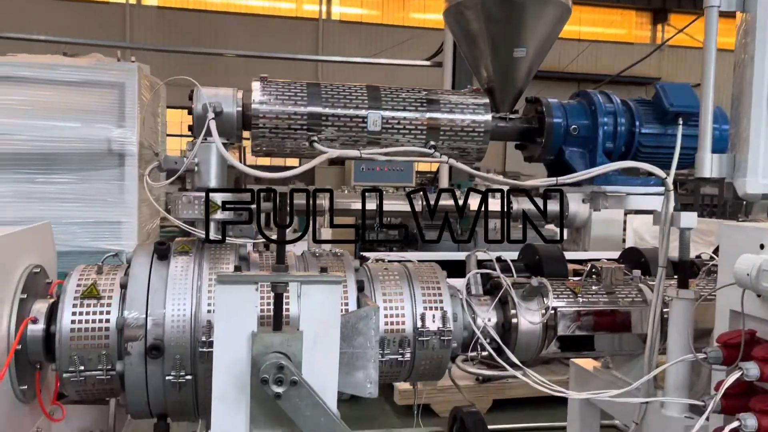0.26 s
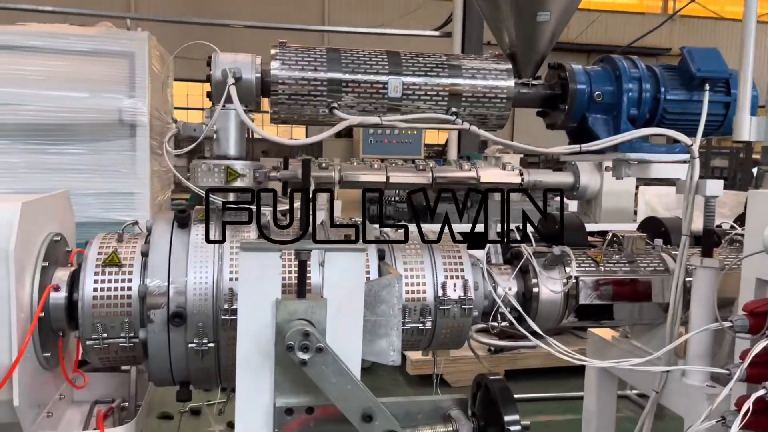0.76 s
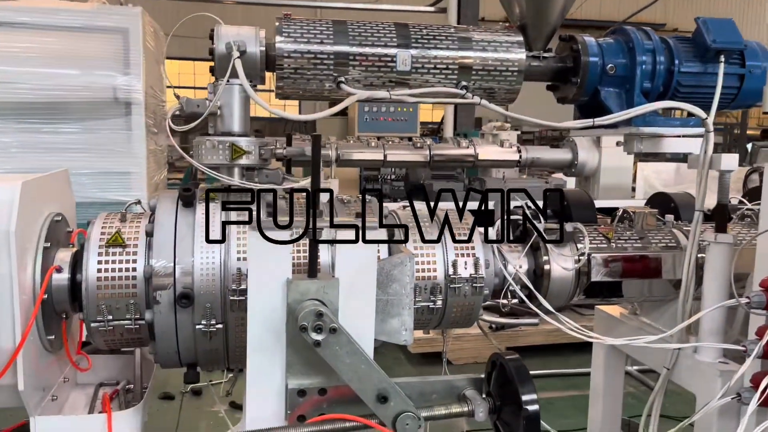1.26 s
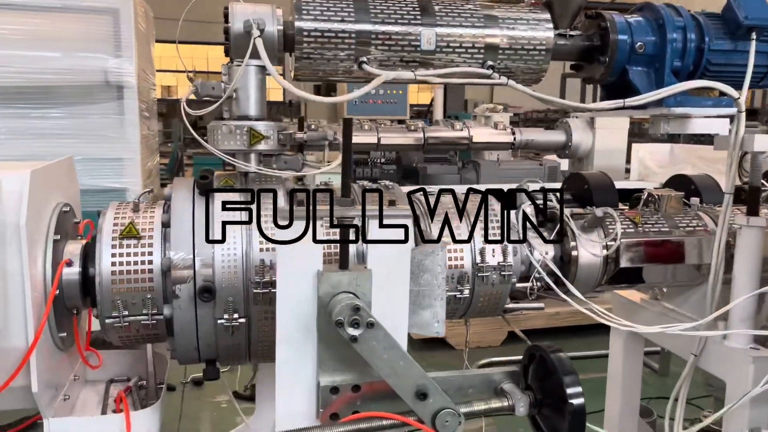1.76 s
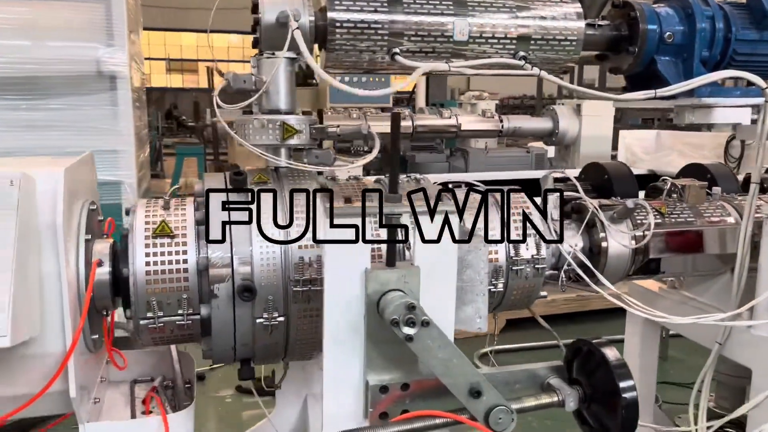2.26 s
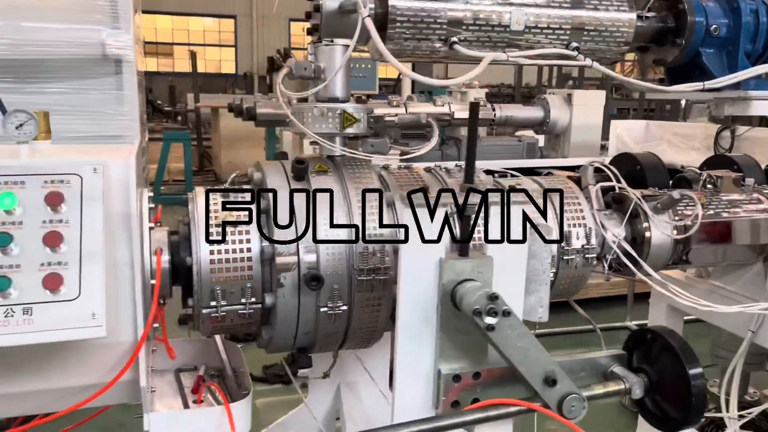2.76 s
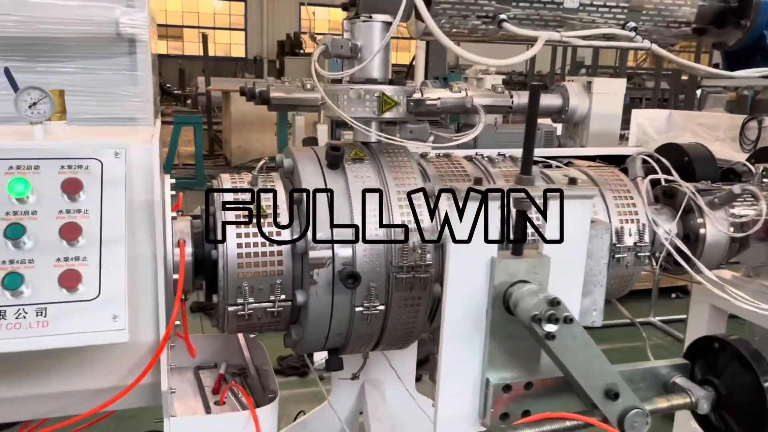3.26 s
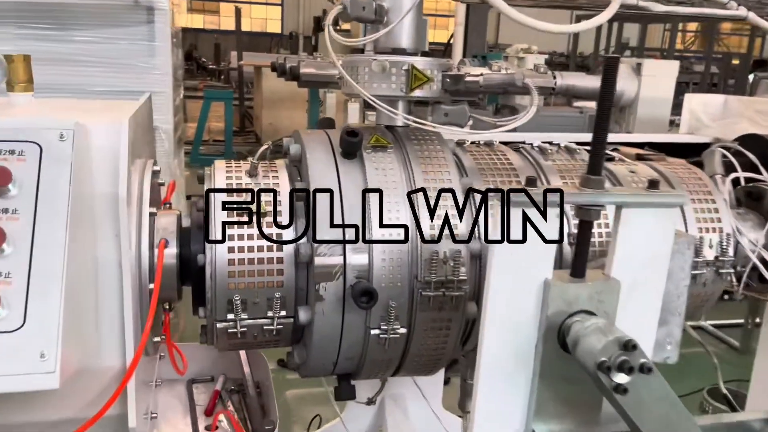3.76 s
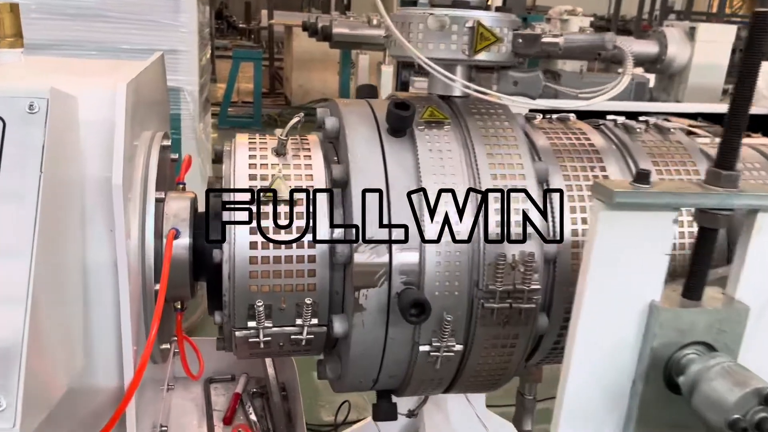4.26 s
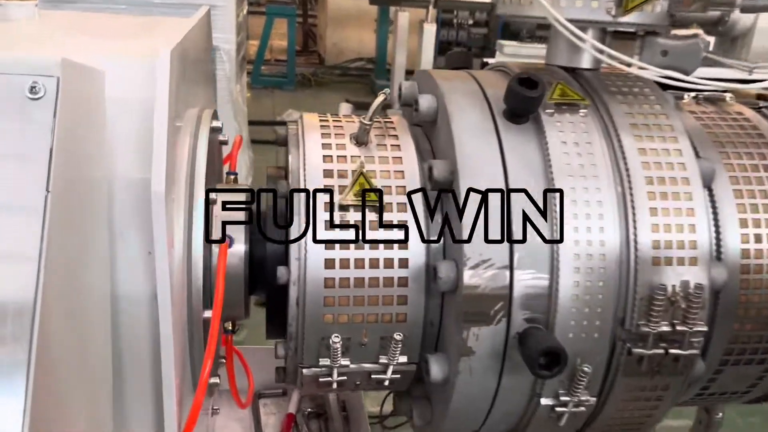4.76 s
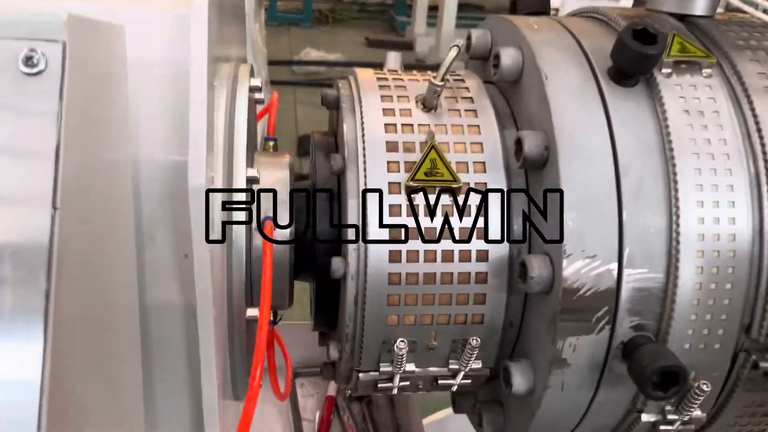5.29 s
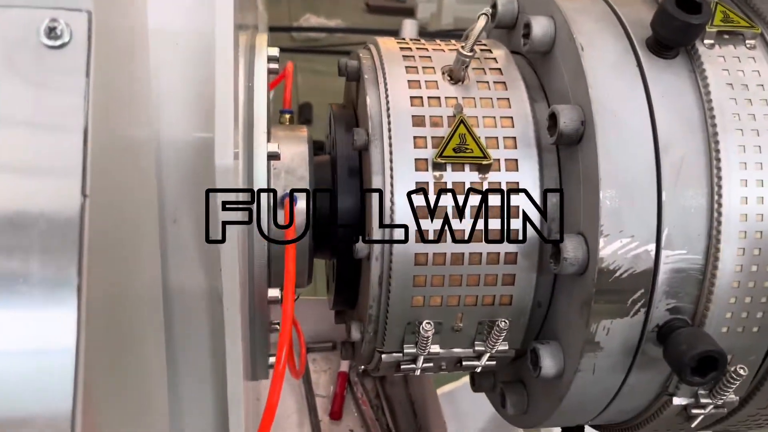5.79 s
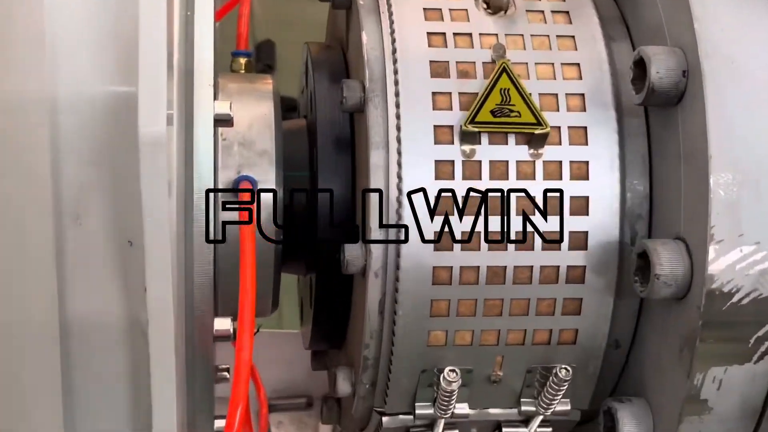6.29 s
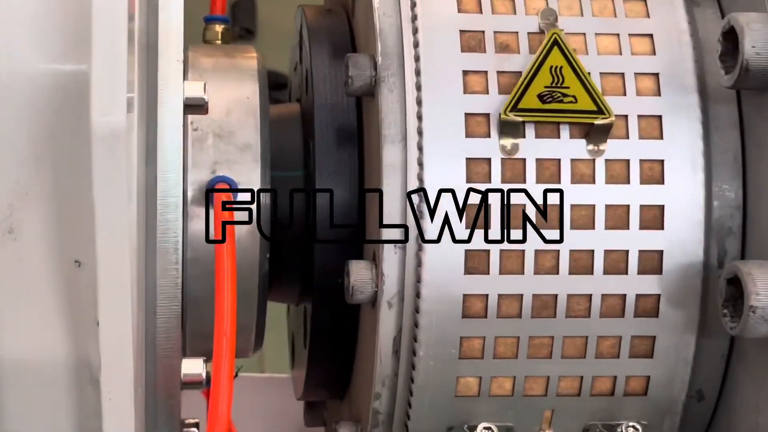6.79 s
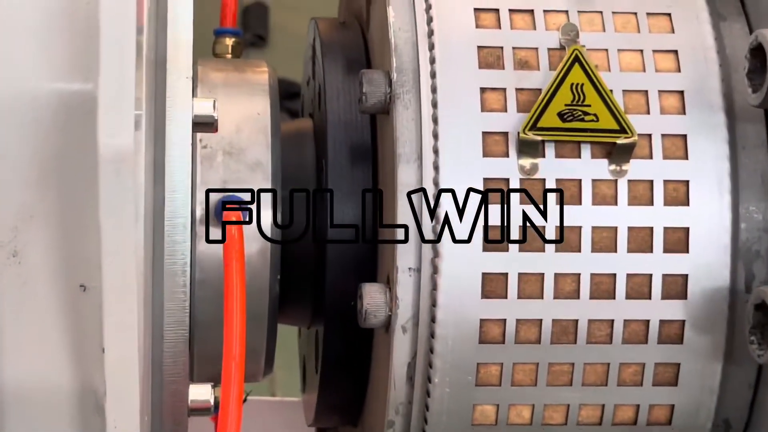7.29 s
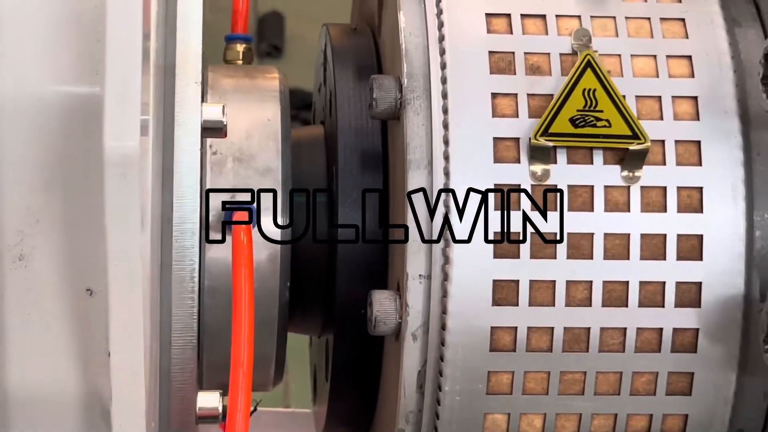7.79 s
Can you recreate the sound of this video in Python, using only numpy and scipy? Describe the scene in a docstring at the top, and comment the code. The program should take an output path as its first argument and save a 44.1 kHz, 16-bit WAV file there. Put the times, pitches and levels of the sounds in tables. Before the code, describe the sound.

A plastic pipe extrusion line runs in a large factory hall. A steady low rumble carries the wavering hum of motors and gearboxes, with cooling blowers roaring above it and a thin, high drive whine fading in and out. A compressed-air jet hisses throughout. As the microphone is walked up to the die head, the blower noise shifts in colour and the hiss becomes brighter and stronger.

```python
"""The rumble of a large factory hall, with the motors and gearboxes of a plastic pipe extrusion line
humming over it. Cooling blowers roar, a drive whines at its switching tone and a compressed-air jet
hisses at the die. A two-port microphone is walked from far down the hall up to the die head;
the hiss grows brighter as it comes close."""
import sys
import numpy as np
from scipy import signal
from scipy.fft import irfft, next_fast_len
from scipy.io import wavfile
from scipy.ndimage import uniform_filter1d

SR = 44100
rng = np.random.default_rng(int(sys.argv[2]) if len(sys.argv) > 2 else 0)


def generate_wav(signal):
    """Clip the signal to [-1, 1] and save it as 16-bit WAV at the path in sys.argv[1]."""
    frames = np.transpose(np.atleast_2d(signal))
    scaled = np.clip(frames, -1, 1) * 32767
    pcm = np.round(scaled).astype(np.int16)
    wavfile.write(sys.argv[1], SR, pcm)


N = 354563

# Noise at the microphone, one spectrum for each layer and place:
# f/Hz, level/dB per Hz, left over right/dB, likeness of the ports/0-1, right phase lead/rad
HALL_RUMBLE = [(30, -84, 0.2, 0.96, 0.03), (45, -67.2, 0.1, 0.98, 0.01), (60, -56.0, 0.1, 0.99, 0.05),
               (80, -54.5, 0.0, 0.99, 0.12), (115, -52.5, 0.2, 0.98, 0.23), (160, -54.6, 0.2, 0.96, 0.18),
               (230, -54.9, 0.4, 0.91, 0.03), (330, -56.2, 2.3, 0.75, 0.1), (480, -59.6, 0.9, 0.7, -0.29),
               (560, -62.6, 2.7, 0.43, -0.44), (800, -63.9, 3.0, 0.47, -0.67),
               (1000, -66.3, 2.4, 0.63, -1.44), (1200, -66.6, 0.5, 0.42, -2.77),
               (1400, -65.6, -0.1, 0.23, -2.04)]
# the blowers from five places along the walk, same columns
BLOWERS_DISTANT = [(1300, -67.0, -2.0, 0.47, 2.9), (1550, -66.5, -2.7, 0.52, 2.97),
                   (1750, -69.7, 3.8, 0.56, 5.16), (1950, -69.9, 6.1, 0.28, 5.05),
                   (2200, -67.0, 4.4, 0.29, 6.89), (2500, -64.8, 2.1, 0.3, 6.03),
                   (2900, -64.6, 0.8, 0.42, 7.01), (3250, -60.9, 0.2, 0.78, 6.23),
                   (3600, -60.3, 1.4, 0.67, 5.91), (3950, -58.6, 1.1, 0.44, 5.66),
                   (4150, -60.9, 2.5, 0.57, 5.98), (4330, -61.6, 2.4, 0.58, 5.99),
                   (4600, -60.9, 1.2, 0.63, 5.69), (4900, -58.0, 1.9, 0.5, 5.01),
                   (5150, -58.6, 1.8, 0.3, 3.73), (5500, -61.8, 0.4, 0.31, 2.08),
                   (6100, -68.3, -0.2, 0.49, 0.73), (6700, -72.1, 0.0, 0.43, 0.46)]
BLOWERS_FAR = [(1300, -65.7, -0.2, 0.48, -3.03), (1550, -65.4, -3.3, 0.52, -2.89),
               (1750, -69.4, 4.6, 0.52, -1.13), (1950, -69.4, 7.4, 0.23, -0.23),
               (2200, -64.8, 4.6, 0.3, -0.83), (2500, -63.9, 2.0, 0.47, -1.98),
               (2900, -62.8, 0.0, 0.64, 0.24), (3250, -61.5, 3.0, 0.57, 0.62),
               (3600, -61.2, 0.4, 0.83, 0.05), (3950, -58.8, 2.0, 0.5, -1.07),
               (4150, -59.6, 3.9, 0.58, 0.2), (4330, -61.1, 0.9, 0.84, 0.05),
               (4600, -58.0, 1.4, 0.81, -0.55), (4900, -56.0, 2.7, 0.54, -0.98),
               (5150, -59.9, 0.8, 0.27, -1.34), (5500, -61.9, 0.8, 0.46, -3.66),
               (6100, -68.0, 0.8, 0.43, -5.39), (6700, -70.4, -0.5, 0.32, -5.08)]
BLOWERS_PASSING = [(1300, -63.8, 1.3, 0.39, -2.59), (1550, -63.6, -3.8, 0.71, -1.73),
                   (1750, -66.0, 4.0, 0.63, -2.42), (1950, -65.6, 6.7, 0.23, -5.44),
                   (2200, -61.8, 5.9, 0.51, -6.36), (2500, -63.1, 1.5, 0.53, -9.39),
                   (2900, -59.0, -0.6, 0.91, -12.43), (3250, -55.9, 0.9, 0.9, -12.56),
                   (3600, -57.2, 1.7, 0.77, -13.22), (3950, -56.5, 4.0, 0.06, -12.48),
                   (4150, -59.7, 2.3, 0.59, -11.61), (4330, -63.3, 0.2, 0.92, -12.54),
                   (4600, -61.8, -2.5, 0.46, -13.35), (4900, -60.7, -1.0, 0.73, -12.41),
                   (5150, -62.0, 3.8, 0.18, -12.24), (5500, -64.1, 1.2, 0.45, -10.28),
                   (6100, -70.1, 0.9, 0.08, -11.57), (6700, -70.0, -0.8, 0.49, -11.64)]
BLOWERS_BESIDE = [(1300, -63.3, 1.9, 0.14, -2.77), (1550, -60.6, -4.9, 0.71, -1.98),
                  (1750, -65.3, 3.6, 0.67, -2.16), (1950, -66.7, 8.3, 0.15, -4.1),
                  (2200, -62.6, 3.4, 0.51, -5.84), (2500, -67.6, 2.3, 0.15, -5.77),
                  (2900, -61.6, -1.8, 0.79, -6.3), (3250, -58.5, -2.0, 0.76, -6.97),
                  (3600, -59.8, -0.5, 0.72, -7.47), (3950, -61.7, 1.1, 0.27, -7.8),
                  (4150, -61.9, 1.8, 0.3, -6.83), (4330, -62.0, 3.0, 0.58, -6.19),
                  (4600, -56.8, -1.7, 0.85, -6.5), (4900, -54.3, 1.5, 0.85, -6.89),
                  (5150, -58.3, 4.3, 0.45, -6.9), (5500, -61.8, 0.2, 0.41, -6.02),
                  (6100, -69.0, -1.2, 0.45, -6.03), (6700, -71.2, -0.2, 0.22, -5.04)]
BLOWERS_CLOSE = [(1300, -64.4, -1.0, 0.12, 2.11), (1550, -62.6, -6.7, 0.67, 4.14),
                 (1750, -59.6, -7.1, 0.89, 6.15), (1950, -59.3, -6.2, 0.87, 5.85),
                 (2200, -62.0, -3.2, 0.84, 5.7), (2500, -62.1, -1.4, 0.82, 5.66),
                 (2900, -59.2, 0.0, 0.99, 6.26), (3250, -55.5, -0.1, 0.99, 6.26),
                 (3600, -61.0, -0.0, 1.0, 6.28), (3950, -58.0, -0.0, 1.0, 6.28),
                 (4150, -61.1, 0.0, 1.0, 6.28), (4330, -64.2, -0.0, 1.0, 6.28),
                 (4600, -59.1, 0.0, 1.0, 6.28), (4900, -55.5, 0.0, 1.0, 6.28),
                 (5150, -60.4, -0.0, 1.0, 6.28), (5500, -67.7, -0.1, 0.96, 6.3),
                 (6100, -71.0, -0.1, 0.91, 6.36), (6700, -72.8, 0.2, 0.53, 6.69)]
# high hiss at three places, same columns; in some bands the two channels are set exactly in phase
# or opposite, a stereo colouring that is not the jet's own
HISS_FIRST = [(6800, -72.3, 1.0, 0.25, 1.64), (7150, -73.5, 0.4, 0.63, 2.79),
              (7500, -71.6, 0.3, 0.84, 3.01), (7950, -63.0, 0.0, 1.0, 3.142),
              (8780, -67.0, 0.0, 1.0, 3.142), (9000, -65.5, 0.5, 0.83, 3.53),
              (9450, -65.9, -0.4, 0.72, 4.13), (10000, -73.1, -0.2, 0.43, 4.81),
              (10450, -70.3, -0.3, 0.81, 6.11), (11100, -71.8, -0.0, 1.0, 6.28),
              (11600, -68.0, -0.0, 1.0, 6.28), (12000, -66.5, -0.0, 1.0, 6.28),
              (12950, -67.7, 0.0, 1.0, 6.283), (13300, -66.6, 0.4, 0.68, 7.44),
              (13960, -61.0, 0.3, 0.82, 8.07), (14500, -69.1, 0.0, 0.84, 9.29),
              (14850, -66.6, 0.0, 1.0, 9.425), (15600, -65.5, 0.0, 1.0, 9.425)]
HISS_SECOND = [(6800, -70.8, -0.0, 0.38, 1.66), (7150, -73.8, 0.4, 0.55, 2.72),
               (7500, -71.3, 0.8, 0.85, 3.0), (7900, -64.6, 0.0, 1.0, 3.142),
               (8780, -67.0, 0.0, 1.0, 3.142), (9000, -65.9, -0.3, 0.84, 3.57),
               (9450, -64.7, -0.4, 0.77, 4.12), (10000, -70.1, -0.3, 0.56, 4.6),
               (10450, -71.9, -0.0, 1.0, 6.28), (11100, -70.9, 0.0, 1.0, 6.28),
               (11600, -63.1, 0.0, 1.0, 6.28), (12000, -66.8, -0.0, 1.0, 6.28),
               (12900, -68.8, -0.0, 1.0, 6.28), (13300, -66.5, -0.2, 0.68, 7.39),
               (13960, -64.0, -0.1, 0.79, 8.1), (14500, -73.7, 0.0, 0.81, 9.26),
               (14800, -74.3, 0.0, 1.0, 9.43), (15600, -70.5, -0.0, 1.0, 9.42)]
HISS_THIRD = [(6800, -71.1, -0.3, 0.43, 1.17), (7150, -68.8, 0.5, 0.55, 1.82),
              (7880, -58.8, 0.1, 0.85, 2.7), (8300, -62.8, 0.0, 1.0, 3.142), (8680, -62.4, 0.0, 1.0, 3.142),
              (9000, -60.6, 0.3, 0.85, 3.63), (9450, -59.2, -0.2, 0.79, 4.11),
              (10000, -75.0, 0.2, 0.33, 4.16), (10450, -70.7, 0.1, 0.94, 6.24),
              (11100, -69.2, 0.0, 1.0, 6.28), (11600, -65.2, -0.0, 1.0, 6.28),
              (12000, -60.8, -0.0, 1.0, 6.28), (12900, -61.6, 0.0, 0.99, 6.3),
              (13300, -57.9, 0.3, 0.82, 7.41), (13960, -52.0, -0.2, 0.84, 8.02),
              (14500, -60.8, 0.1, 0.78, 9.19), (14800, -58.6, 0.0, 0.95, 9.4),
              (15600, -61.5, 0.0, 0.97, 9.43)]
# the walk: t/s, blower place (0 distant to 4 close), hiss place (0 first to 2 third), hiss gain/dB
MIC_WALK = [(0, 0, 0.14, -1.4), (1.7, 0, 0.36, -0.92), (2.2, 0.5, 0.86, -0.64), (2.7, 0.83, 0.92, -1.2),
            (3.75, 1, 0.89, 0.3), (4.2, 1.8, 0.99, 0.92), (4.75, 2, 1.35, 0.3), (5.0, 2.35, 1.65, -0.059),
            (5.35, 2, 1.7, 0.43), (5.42, 3, 1.76, -0.11), (6.1, 3, 1.8, -0.077), (6.17, 4, 2, 0.12),
            (8.04, 4, 2.1, -0.84)]
# the low, middle, upper and gear-mesh hums: f/Hz
HUM_HZ = [97.0, 136.0, 279.5, 364.5]
# each hum's pitch waver: spread/Hz, rate/Hz
HUM_WAVER = [(4.5, 7.0), (4.0, 7.0), (11.0, 12.0), (1.0, 4.0)]
# each hum between swells: level far from the die/dB, level close/dB
HUM_BED = [(-36.5, -40), (-41.5, -37), (-39.5, -49), (-45.5, -49.5)]
# swells, one list for each hum: t/s, peak level/dB
HUM_SWELLS = [
    [(0.42, -30), (0.93, -31), (1.27, -31), (1.85, -27), (2.08, -29.5), (2.68, -33), (3.2, -32),
     (3.43, -31), (4.05, -26.5), (4.95, -32), (6.5, -31), (7.55, -33)],
    [(0.1, -34.5), (0.42, -31), (0.7, -28.5), (1.2, -34), (1.42, -32), (1.8, -32.5), (2.45, -29.5),
     (3.35, -27.5), (4.0, -28.5), (4.45, -28.5), (6.0, -31), (6.4, -35)],
    [(0.85, -32), (1.35, -38), (2.5, -37), (4.05, -37), (4.7, -34)],
    [(1.85, -33.5), (2.46, -29.5), (2.7, -36), (3.15, -34), (3.75, -32.5), (5.37, -38), (5.95, -37.5),
     (6.5, -40), (7.2, -36.5)],
]
HUM_SWELL_HALF_S = [0.067, 0.088, 0.097, 0.17]
# fainter machine tones: f/Hz, bandwidth/Hz, level/dB
MACHINE_TONES = [(178, 8, -42), (299, 6, -46), (447, 12, -44), (730, 4, -51), (1325, 5, -54)]
# side lines of the drive's switching tone: f/Hz
WHINE_HZ = [3836, 3924.5, 3985.5, 4016, 4045.5, 4075.5]
# spells when a side line stands out, one list for each: middle t/s, length/s, level/dB
WHINE_SPELLS = [
    [(0.75, 1.5, -42)],
    [(1.3, 0.55, -41), (2.05, 0.4, -42), (2.9, 0.6, -41), (4.6, 0.63, -46)],
    [(4.2, 1.0, -46), (7.1, 1.6, -45)],
    [(1.5, 2, -39), (3.62, 0.8, -34), (4.7, 0.31, -41), (6.8, 1.7, -45)],
    [(0.75, 1.3, -39), (2.1, 0.54, -40), (3.8, 1.54, -39), (6.9, 1.7, -43)],
    [(0.92, 0.35, -40), (1.38, 0.45, -33.5), (3.45, 1.05, -40), (4.7, 0.78, -37), (6.6, 2.7, -38.5)],
]


def from_db(db):
    """Decibels to gain."""
    return 10 ** (np.asarray(db) / 20)


def in_time(rows):
    """Columns of a table drawn as straight lines over all samples."""
    times, *columns = np.transpose(rows)
    return [np.interp(np.arange(N) / SR, times, c) for c in columns]


def drift(rate_hz):
    """Slow random wander of spread 1: coarse noise through a double one-pole low-pass."""
    step, settle = 40, 2000
    pole = np.exp(-2 * np.pi * rate_hz * step / SR)
    noise = rng.standard_normal(N // step + settle + 2)
    slow = signal.lfilter([1], [1, -2 * pole, pole * pole], noise)[settle:]
    return np.interp(np.arange(N) / step, np.arange(len(slow)), slow / slow.std())


def noise_field(table, low_hz, high_hz):
    """Noise at one place: a part common to both ports, shifted in phase, plus a diffuse part at each."""
    size = next_fast_len(N)
    all_hz = np.fft.rfftfreq(size, 1 / SR)
    inside = (all_hz > low_hz / 1.05) & (all_hz < high_hz * 1.05)
    hz = all_hz[inside]
    row_hz, *columns = np.transpose(table)
    level_db, balance_db, alike, phase = [np.interp(np.log(hz), np.log(row_hz), c) for c in columns]
    alike = np.clip(alike, 0, 1)
    # neighbouring bands hand over across an eighth of an octave with constant power
    above_low, above_high = [np.clip(np.log2(hz / edge) * 8 + .5, 0, 1) for edge in (low_hz, high_hz)]
    share = np.sqrt(above_low * (1 - above_high))
    common, left, right = rng.standard_normal((3, len(hz), 2)) @ [1, 1j]
    direct = np.sqrt(alike) * common * np.exp([0 * phase, 1j * phase])
    diffuse = np.sqrt(1 - alike) * np.array([left, right])
    port_gain = from_db([level_db + balance_db / 2, level_db - balance_db / 2])
    spectrum = np.zeros((2, len(all_hz)), complex)
    spectrum[:, inside] = share * np.sqrt(SR * size) / 2 * port_gain * (direct + diffuse)
    return irfft(spectrum, size)[:, :N]


def walk_past(tables, place, low_hz, high_hz):
    """Between two places the microphone hears a blend of their powers."""
    place = np.clip(place, 0, len(tables) - 1)
    return sum(np.sqrt(np.clip(1 - abs(place - k), 0, 1)) * noise_field(table, low_hz, high_hz)
               for k, table in enumerate(tables))


def hall_rumble(place):
    """The hall's lows stay steady; its mids rise a little as the microphone nears the machines."""
    lows = noise_field(HALL_RUMBLE, low_hz=20, high_hz=600)
    mids = noise_field(HALL_RUMBLE, low_hz=600, high_hz=1350)
    mids_db = np.interp(place, [0, 2], [-1, 1])
    return lows + from_db(mids_db) * mids


def motor_hums(nearness, wobble_db=2, port_lag_s=0.00038):
    """Motors and gearboxes: near-sines wavering in pitch as the load shifts, with bell-shaped swells."""
    t, out = np.arange(N) / SR, 0
    hums = zip(HUM_HZ, HUM_WAVER, HUM_BED, HUM_SWELL_HALF_S, HUM_SWELLS)
    for hz, (spread_hz, rate_hz), (far_db, close_db), half_s, swells in hums:
        bed_power = from_db(far_db + (close_db - far_db) * nearness + wobble_db * drift(4.6)) ** 2
        swell_power = sum(from_db(db) ** 2 * np.exp(-((t - s) / half_s) ** 2) for s, db in swells)
        turns = np.cumsum(hz + spread_hz * drift(rate_hz)) / SR
        lag_s = port_lag_s / 2 * np.array([[1], [-1]]) * drift(0.91)  # arrival wanders between ports
        out = out + np.sqrt(2 * (bed_power + swell_power)) * np.sin(2 * np.pi * (turns + hz * lag_s))
    return out


def machine_tones():
    """Faint machine tones: noise ringing in narrow bands, mostly the same at both ports."""
    out = 0
    for hz, width_hz, db in MACHINE_TONES:
        pole = np.exp(-np.pi * width_hz / SR)
        resonance = [1, -2 * pole * np.cos(2 * np.pi * hz / SR), pole * pole]
        rings = signal.lfilter([1, 0, -1], resonance, rng.standard_normal((3, N)))
        ports = rings[0] + 0.29 * rings[1:]
        out = out + from_db(db) * ports / ports.std()
    return out


def cooling_blowers(place, throb_db=0.5):
    """The blowers' roar throbs slightly and changes colour as the microphone walks up."""
    spectra = [BLOWERS_DISTANT, BLOWERS_FAR, BLOWERS_PASSING, BLOWERS_BESIDE, BLOWERS_CLOSE]
    return from_db(throb_db * drift(8.0)) * walk_past(spectra, place, low_hz=1350, high_hz=6700)


def drive_whine(nearness, fade_s=0.17, flicker_db=2.2, sway_db=2, sway_rad=0.4):
    """The drive's steady lines fade in and out as the walk crosses standing waves; centred once close."""
    t, out = np.arange(N) / SR, 0
    for hz, spells in zip(WHINE_HZ, WHINE_SPELLS):
        level = sum(from_db(db) * np.clip((length / 2 - abs(t - middle)) / fade_s + .5, 0, 1)
                    for middle, length, db in spells)
        sway = (1 - nearness) * np.array([[1], [-1]]) * drift(0.62)  # opposite at the two ports
        amplitude = np.sqrt(2) * level * from_db(sway_db * sway + flicker_db * drift(5.0))
        out = out + amplitude * np.sin(2 * np.pi * (hz * t + rng.random()) + sway_rad * sway)
    return out


def high_hiss(place, gain_db, flicker_db=0.3):
    """High hiss at three places along the walk, with some bands in phase or opposite in the two channels."""
    gain = from_db(gain_db + flicker_db * drift(15.0))
    return gain * walk_past([HISS_FIRST, HISS_SECOND, HISS_THIRD], place, low_hz=6700, high_hz=17000)


def flutter(air, depth_db=2):
    """Narrow streaks of the hiss, some 80 Hz wide and 0.1 s long, swell and sink, alike at both ports."""
    cells = signal.stft(air, nperseg=1024)[2]
    streaks = rng.standard_normal(cells.shape[1:])
    for axis, size in ((0, 2), (1, 5), (1, 5)):  # smooth once in frequency, twice in time
        streaks = uniform_filter1d(streaks, size=size, axis=axis)
    gain = from_db(depth_db * streaks / streaks.std())
    return signal.istft(cells * gain, nperseg=1024)[1][:, :N]


def scene():
    """The walk to the die head: hall rumble below, blowers in the middle, hiss on top, tones over all."""
    blower_place, hiss_place, hiss_db = in_time(MIC_WALK)
    near_die = np.clip(hiss_place - 1, 0, 1)
    near_blowers = np.clip(blower_place - 3, 0, 1)
    hall = hall_rumble(blower_place)
    air = flutter(cooling_blowers(blower_place) + high_hiss(hiss_place, hiss_db))
    return hall + air + motor_hums(near_die) + machine_tones() + drive_whine(near_blowers)


def record(dry):
    """The top end is cut steeply."""
    cutoff_hz = 15700
    return signal.sosfilt(signal.ellip(12, .5, 80, cutoff_hz, fs=SR, output="sos"), dry)


dry = scene()
out = record(dry)
generate_wav(out)
```